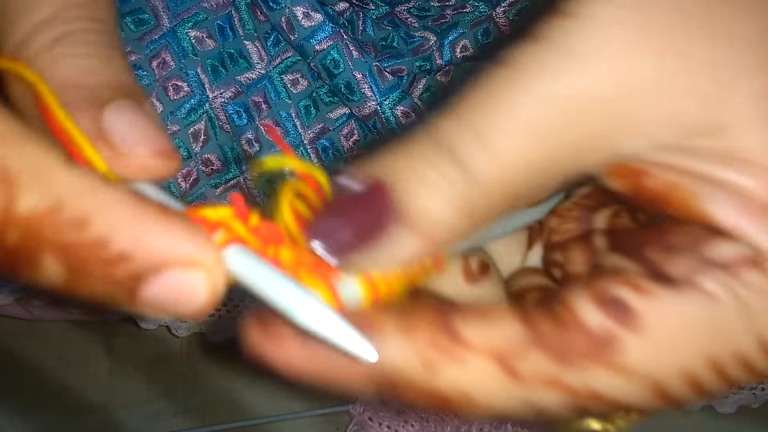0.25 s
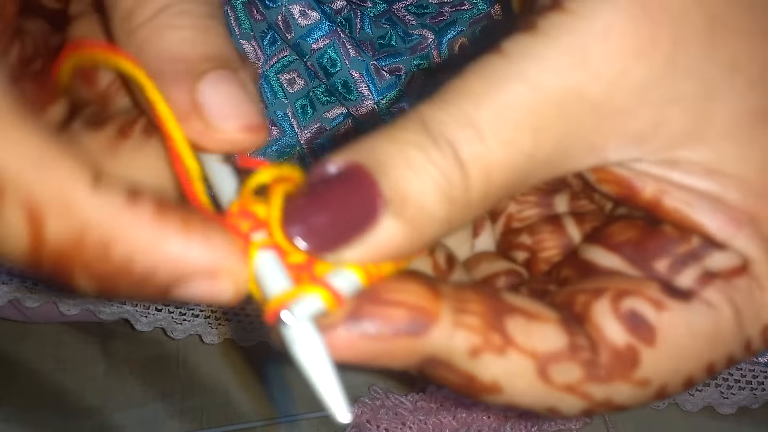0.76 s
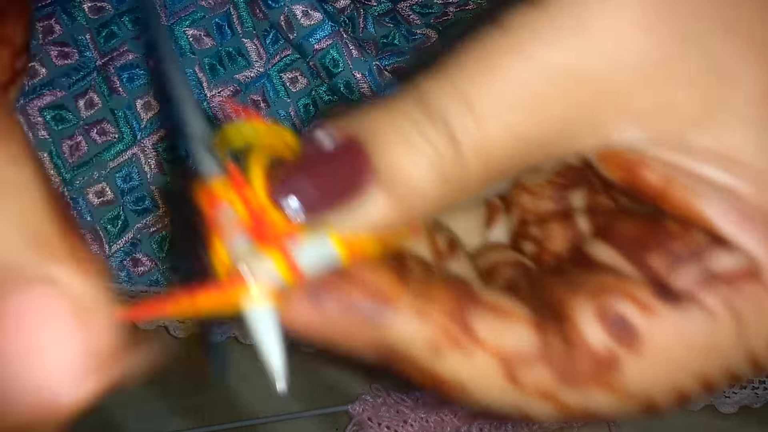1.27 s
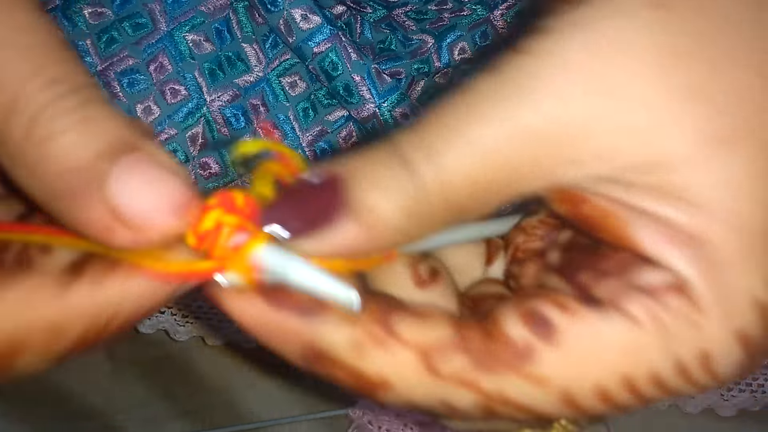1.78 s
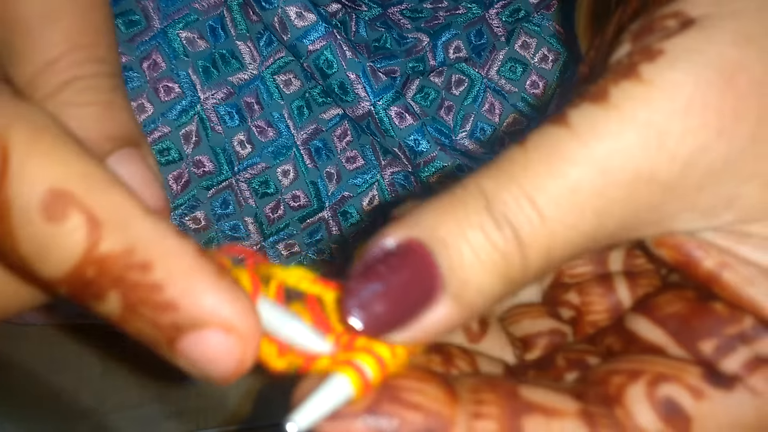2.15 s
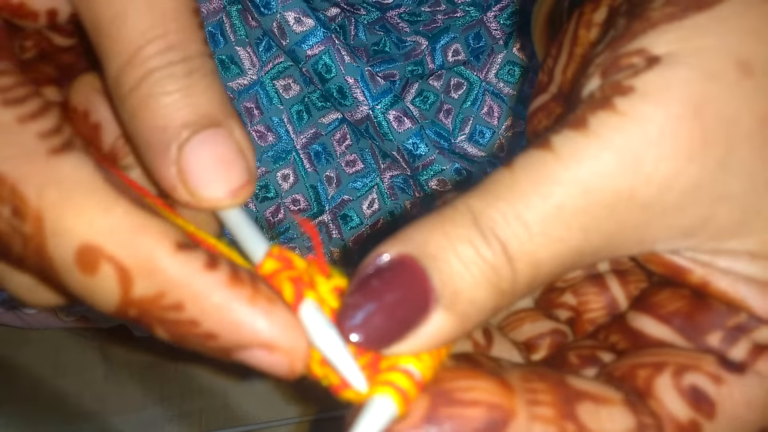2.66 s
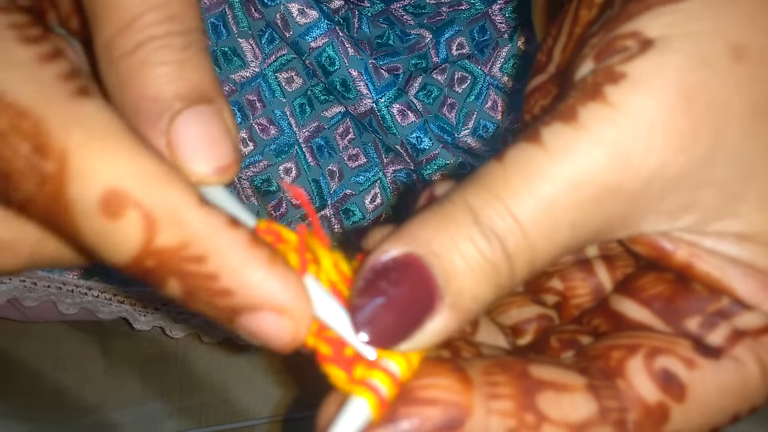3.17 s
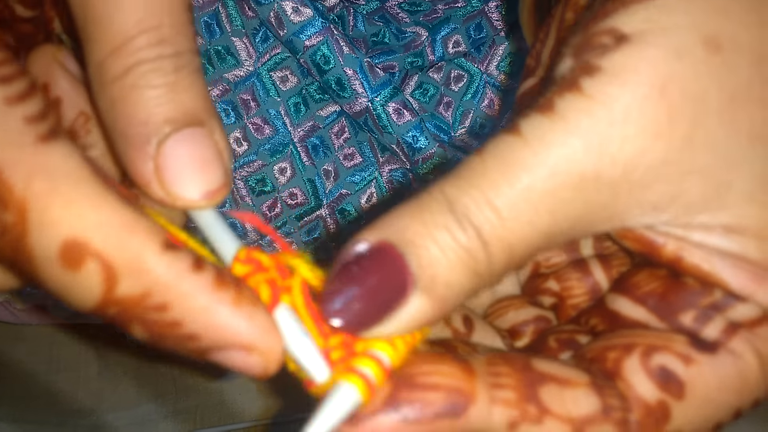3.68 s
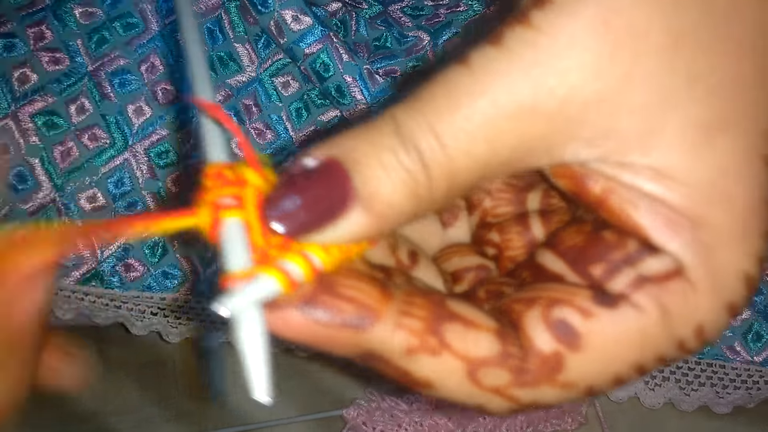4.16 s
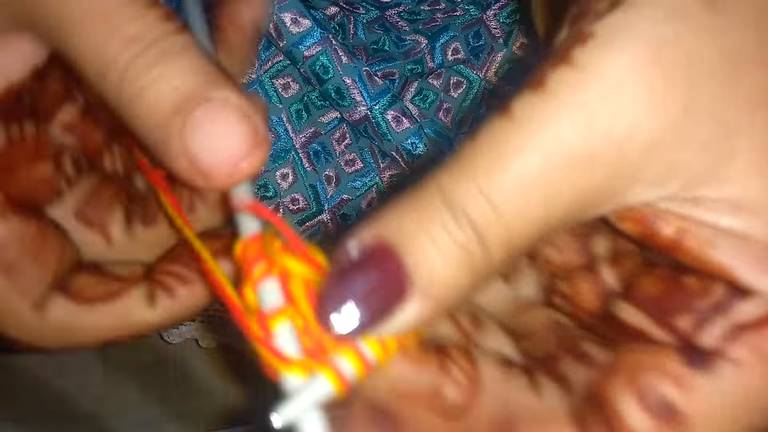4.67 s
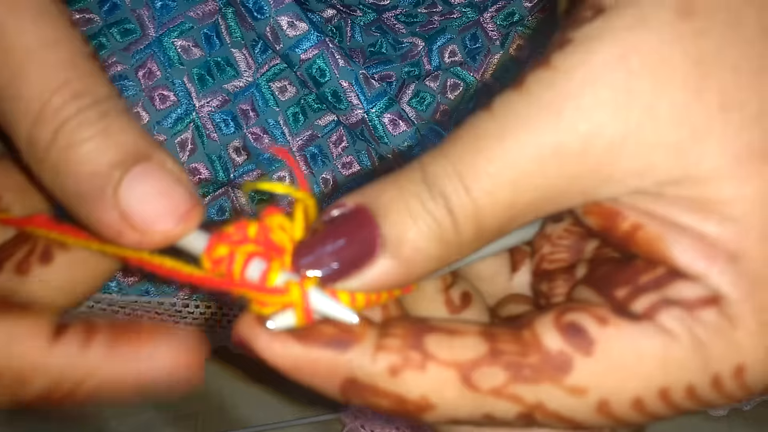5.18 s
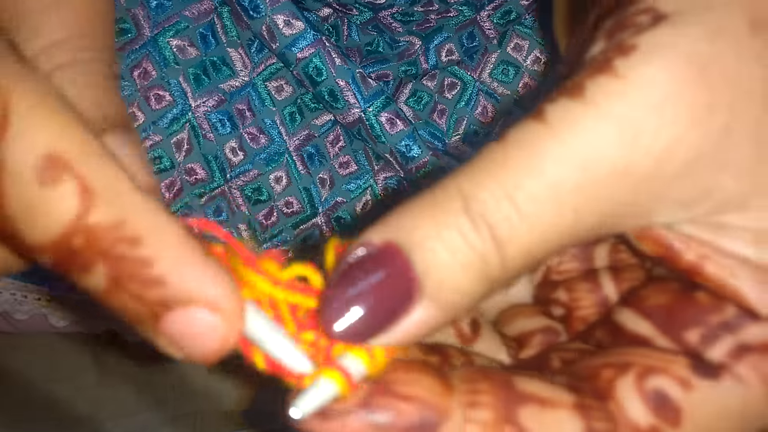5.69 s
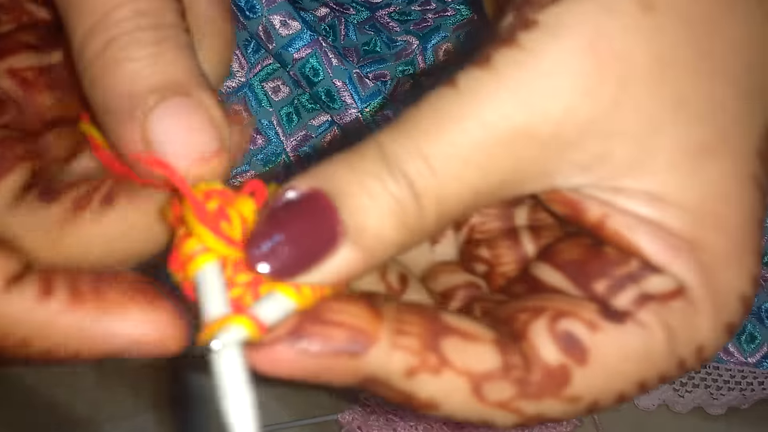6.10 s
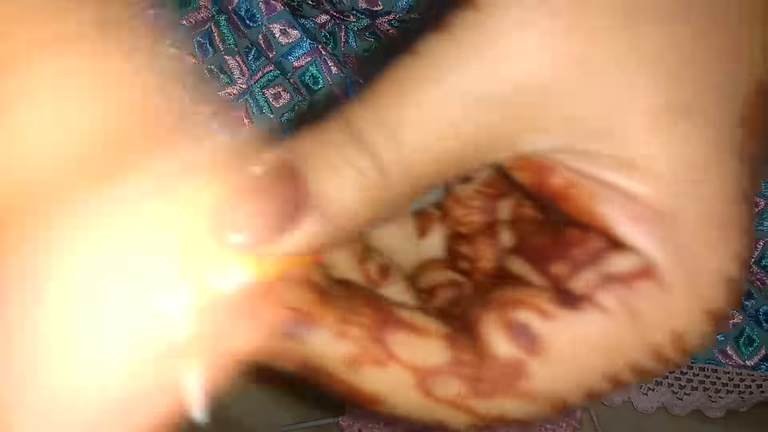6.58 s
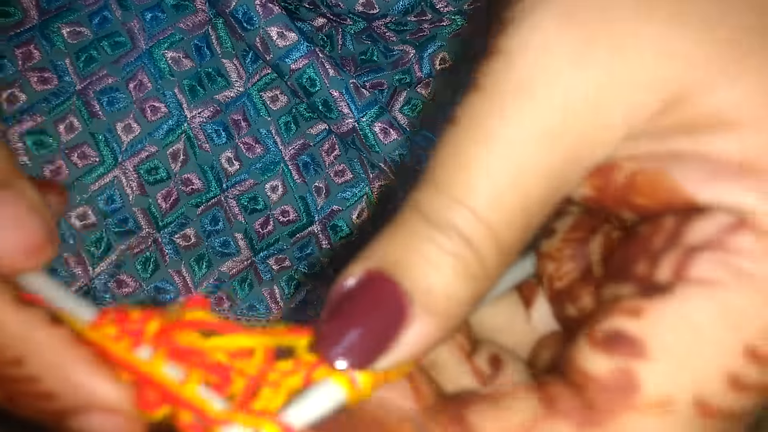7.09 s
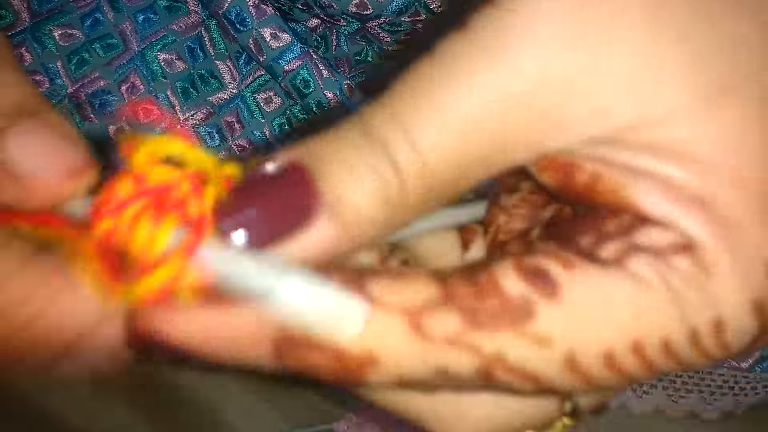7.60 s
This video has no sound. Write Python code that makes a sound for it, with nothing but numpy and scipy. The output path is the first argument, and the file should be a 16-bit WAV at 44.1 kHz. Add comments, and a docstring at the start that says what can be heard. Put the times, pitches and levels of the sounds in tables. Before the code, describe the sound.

Hand knitting, close up, in a small quiet room. Soft hiss, low motor-like hum and a gently swelling rush sit behind throughout. From 0.2 s two hollow metal needles tick together near the left microphone, bright, short and dry, a few with a faint high ring; wool rustles airily over the tips. Around 0.7 s dull knocks and a tiny scrape join. Taps crowd together from 0.9 to 1.5 s, with sharp clicks at 1.24 and 1.46 s; the background dips after each, deeply the second time, then climbs back. From 1.6 to 3.5 s only sparse faint ticks remain, with small knocks near 3.4 and 3.6 s. Taps thicken at 4.0 to 4.6 s, then thin out. Two quick scrapes come at 6.0 s, followed by busy clicking, a strong tap and dip near 6.5 s, another clear tap at 7.0 s, and scattered light ticks to the end.

```python
"""Close in, a pair of microphones: wool rustles over needle tips, the room hisses, hums and rushes softly behind.
From 0.2 s two hollow metal knitting needles tap by the left one: struck modes, some ringing on; faint tones swell.
Dull knocks and short scrapes join from 0.7 s; the background dips at 1.2 s, deeply at 1.45 s, and climbs back.
A sparser stretch follows; the taps thicken again at 4 s and from 6 s, with two more scrapes and a dip at 6.5 s.
Short echoes follow the needles; the recorder takes a delayed copy of each side from the other to widen the image."""
import sys
import numpy as np
from scipy import signal
from scipy.fft import rfft, irfft, next_fast_len
from scipy.io import wavfile

SR = 44100
rng = np.random.default_rng(int(sys.argv[2]) if len(sys.argv) > 2 else 0)


def persist_wave(psi):
    """Save psi, clipped to +-1, as 16-bit WAV."""
    counts = np.round(np.clip(psi, -1, 1) * 32767).astype(np.int16)
    wavfile.write(sys.argv[1], SR, np.atleast_2d(counts).T)


N = 346185

# Levels are those in front of the microphones, ahead of the recorder's widening and filters.

# Wool sliding over the tips. Each row: time in seconds, rms level in dB.
SLIDE = [(0, -62), (1.38, -60), (1.53, -70.5), (1.83, -74), (2.84, -74), (2.97, -67), (3.28, -75),
         (3.98, -61), (5.9, -65), (6.21, -62.5), (6.38, -59), (6.78, -69), (7.22, -60), (7.85, -68.5)]
# Broad resonances of the rustle. Each row: frequency in Hz, width in Hz, relative level in dB.
WOOL = [(3057, 167, -6.5), (5460, 1800, 1.5), (8200, 1070, 1.5), (12900, 5700, -5)]
SLIPS_PER_S, CLUMP_DB = 3000, 6   # median rate; spread of the rate as slips bunch together

# Spectrum of the room noise. Each row: frequency in Hz, relative density in dB per Hz.
ROOM_SPECTRUM = [(30, -7), (55, 10), (130, 7.5), (290, -1), (420, -8.5), (680, -10.5), (1000, -12),
                 (2000, -13), (4000, -17.5), (8000, -24), (12000, -41.5), (16000, -49.5)]
ROOM_DB = -49   # rms before the dips
# How alike the room is at both microphones. Each row: frequency in Hz, likeness from 0 to 1.
LIKENESS = [(60, 1), (200, 0.9), (350, 0.52), (700, 0.32), (1000, 0), (3000, 0.023), (8000, 0.04)]
# Lean of the room noise. Each row: frequency in Hz, left over right in dB.
LEAN = [(100, -1), (1000, -1.5), (5000, -0.5), (12000, -37.5)]
# Motor hum. Each row: frequency in Hz, width in Hz, rms level in dB before the dips.
HUM = [(130.3, 14, -62.7), (294, 7, -60.5), (590, 9, -71), (1178, 14, -75)]
# Soft rush that swells now and then. Each row: time in seconds, rms level in dB before the dips.
RUSH = [(0, -72), (1.09, -59.5), (1.46, -67), (1.6, -68.5), (2.67, -68.5), (3.78, -63), (4.6, -61),
        (5, -73), (5.5, -64.5), (6.2, -75), (6.4, -59), (6.7, -63), (7.28, -68), (7.85, -67.5)]
RUSH_HZ, RUSH_WIDTH_HZ = 655.5, 190

HISS_DB, HISS_LOW_HZ = -56.5, 7140   # the recorder's own hiss: level ahead of its low cut; the cut
# Dips of the background. Each row: start in seconds, depth in dB, hold in seconds from the start,
# recovery in dB per second.
DIPS = [(-.01, 2, .001, 2.5), (1.223, 7.5, 0.00086, 6), (1.448, 19, 0.46, 10.5), (4.054, 2.5, .1, 1.27),
        (6.458, 9, .001, 9)]
SINK_S = 0.025
ROOM_T60_S, WALL_CUT_HZ, WET_DB = 0.16, 7000, -11.5   # echoes: decay, treble cut, gain

# Needle taps. Each row: time in seconds, main body strength in dB (rms over 10 ms, before chance),
# low body over main in dB, high body over main in dB, chatter decay in seconds.
TAPS = [(0.1855, -39, -22, -3, 0.0012), (.193, -49, -10, -8, 0.0054), (0.2178, -41, -13, -0.5, 0.0023),
        (0.222, -44.5, -21, 5, 0.0024), (0.4004, -45.5, -5, -4, 0.0007), (0.57, -50, -1, -4, 0.00087),
        (0.574, -46, -1.5, -3, 0.0025), (.678, -59, 10, -2, 0.00094), (0.7026, -49.5, 3, -10, 0.002),
        (0.7583, -58, 14, -7, 0.0044), (0.8348, -47.5, -13, -1, .0008), (0.887, -39, -18, -8, 0.0031),
        (0.902, -39.5, -26, -9, 0.0037), (1.031, -56, 0, -6, 0.0023), (1.036, -45, -7, -5, 0.004),
        (1.0407, -48, -11, -6, 0.0029), (1.048, -44, -15, -6, 0.014), (1.0678, -40, -9, 1, 0.0034),
        (1.072, -46, -19, -3, 0.0028), (1.084, -49.5, -4, -6, 0.0024), (1.1565, -44.5, -25, -4, 0.00087),
        (1.1959, -48, -10, -3, 0.0046), (1.2367, -27, -44, -18, 0.00087), (1.25, -39.5, -20, -13, 0.0039),
        (1.292, -48.5, -13.5, 1, 0.0058), (1.318, -58.5, -15, 6, 0.0034), (1.3817, -54, 0, -9, 0.0022),
        (1.432, -46, -27, -4, 0.0049), (1.4572, -26, -10.5, 0.5, 0.00068), (1.465, -43.5, -3.5, 1, 0.016),
        (1.4985, -51, -2.5, 4, 0.029), (1.524, -59, -14, -1, 0.0042), (1.805, -68.5, -3, 4, 0.0023),
        (2.102, -55, -30, -6, 0.0055), (2.218, -56.5, -16.5, 2, 0.0048), (2.471, -62.5, -9, 2, 0.0032),
        (2.898, -59, -10, 8, 0.0036), (3.025, -59, -7, 8.5, 0.0037), (3.0782, -64, 2, 6, 0.0038),
        (3.5234, -59, -1, -4, 0.00098), (3.7503, -45.5, -10.5, 4, 0.001), (3.863, -57.5, 3, 7, 0.0043),
        (3.9983, -42.5, -22, -3, 0.00064), (4.0113, -36.5, -17.5, -4, 0.0027), (4.029, -50, -8, -8, 0.0027),
        (4.068, -36.5, -15, -4, 0.0016), (4.085, -51, -8, -2, .0015), (4.0898, -47, -10, -5, .0052),
        (4.134, -55, -6.5, 1, .011), (4.174, -54, -15, -9, 0.00089), (4.291, -52, -4, -3, 0.0017),
        (4.2948, -46.5, -17, -4, 0.00054), (4.307, -52, -3, 0, 0.0085), (4.459, -55, -10, -2, 0.0026),
        (4.463, -39.5, -27, 5, 0.003), (4.473, -50.5, -23, 10, .004), (4.492, -42, -17, -3, 0.002),
        (4.501, -40.5, -13.5, -3, 0.0047), (4.5663, -47, -6.5, -6, 0.0015), (4.578, -50, -8, -3, 0.0051),
        (4.766, -55, -1, 4.5, 0.15), (5.059, -51.5, -3.5, -5, 0.0043), (5.079, -48, -10, -1, .0018),
        (5.2047, -52.5, -15, -1, 0.0039), (5.357, -55.5, -6, 5.5, 0.0031), (5.606, -52, -7, -5, 0.0053),
        (6.0047, -51, 0, -3, 0.0012), (6.027, -53, 5, -4, 0.001), (6.0348, -51, 6, -6, 0.001),
        (6.0498, -41, -7, -6, 0.0015), (6.053, -53.5, 12, -1, 0.0019), (6.0566, -51, 20, -3, 0.0011),
        (6.063, -58, 6, -3, 0.0033), (6.0673, -56, -2, -3, 0.0011), (6.074, -59, 3, -3, 0.0018),
        (6.137, -53.5, -14, -4, .005), (6.1807, -45.5, -4.5, 0, 0.00086), (6.1838, -40.5, -27, -5, 0.0035),
        (6.2533, -40.5, -17, -7, 0.00083), (6.2863, -42.5, -22, -13, 0.0022), (6.345, -54, -13, -9, .002),
        (6.357, -45.5, -23, -7, 0.00085), (6.4114, -47.5, -2, -3, 0.004), (6.424, -40, -11, -7, 0.014),
        (6.4323, -39, -17, -2, 0.0018), (6.4355, -38, -20, -6, 0.002), (6.4395, -38.5, -18, -3, .003),
        (6.468, -31.5, -18, -6, 0.00082), (6.477, -49, -8, -6, .002), (6.5298, -49, -37, 1, 0.0033),
        (6.553, -56, -26, 9, .0015), (6.63, -53, -27, -21, 0.00071), (6.635, -51.5, -14, -5, 0.0031),
        (6.6773, -44, -22, -5, 0.006), (6.6836, -39, -15.5, -3, 0.0015), (6.708, -55, -3, -7, 0.0027),
        (6.8278, -55, -7, 2, 0.0046), (6.8528, -54, -10, -3, 0.003), (6.953, -50.5, -20, 6, 0.0026),
        (7.002, -33.5, -21, -12, 0.0045), (7.0233, -56, -25, -11, 0.015), (7.062, -49, -18, -8, 0.0092),
        (7.1475, -45, -6, 0, 0.0013), (7.343, -59.5, 4, -4, 0.011), (7.3667, -49.5, -3.5, 1, 0.001),
        (7.5955, -51.5, -3, 3.5, 0.0019), (7.612, -51, -9, 2, 0.018)]
# Needle modes. Each row: frequency in Hz, relative level in dB, t60 in seconds.
NEEDLE = [(2968, 0.5, 0.0045), (3340, -4.5, 0.003), (4280, 10, 0.033), (5010, 4.5, 0.0042),
          (6020, 7, 0.076), (6080, 11, 0.077), (6160, 3, 0.00064), (7230, 4, 0.0014), (8250, -5, 0.0037),
          (9187, 0.5, 0.015), (9370, 0, 0.0081), (9840, 1.5, 0.0054), (10840, -1, 0.0035),
          (11490, 10, 0.12), (11500, -4, 0.054), (12700, -2.5, 0.0016), (13130, 9, 0.068),
          (13500, -5, 0.0029), (15200, 0, 0.0035)]
# Borders between the low, middle, main and high body, in Hz.
BODY_BORDERS_HZ = [4700, 7800, 10400]
# Pitch shifts of the damped modes by the grip, as shares of their frequency.
GRIPS = [-.012, 0, .012]
# Taps on a tube the fingers leave free, so it rings on. Each row: time in seconds, level in dB,
# upper modes over lower in dB.
FREE_RINGS = [(0.2206, -57, 7), (1.433, -65, 13), (1.524, -70, 14), (2.218, -71.5, 6), (2.8987, -70, 2),
              (4.0108, -54, 0), (4.4618, -57.5, 3), (5.204, -64, -7), (6.052, -57.5, -3), (6.185, -62, 3),
              (6.432, -67, 13), (6.531, -67, -2), (6.951, -67, 18), (7.062, -70, -10)]
FREE_T60_S = .028   # modes slower than this sound only in the free rings
FIRST_BLOW, CHATTER_PER_S = 0.7, 5000   # size of the blow among rebounds up to 1; rebound rate
RISE_S, RISE_SHARE = .0007, .25   # grazing lead-up: base, plus this share of the chatter decay
SNAP_DB, SNAP_LOW_HZ, SNAP_HIGH_HZ = 17, 2800, 7500   # toneless snap: over the middle body; its band
FAR_SIDE_DB, FAR_LAG_S = -13, .00025   # a tap at the right microphone: over left; longest extra path
MIDDLE_DB, MIDDLE_FOLLOWS = 3, 0.74   # middle body over main; share of the low body's swing

# Faint far tones. Each row: start in seconds, end in seconds, frequency in Hz, width in Hz,
# level at full swell in dB.
FAR_TONES = [(3.38, 4.25, 250, 15, -61), (0.22, 0.53, 430, 6.1, -62.5), (3.7, 4.02, 1090, 61, -63.5),
             (0.77, 1.1, 718, 45, -62), (4.8, 5.1, 680, 18, -62.5), (5.15, 5.34, 660, 14, -65)]
# Dull knocks of hand or needle end. Each row: time in seconds, height in dB before panning,
# frequency in Hz, t60 in seconds.
KNOCKS = [(0.6935, -39, 1020, 0.0063), (0.725, -36, 2010, 0.011), (.861, -40, 1730, 0.016),
          (1.39, -37, 110, 0.11), (1.457, -27, 1000, 0.0025), (1.4574, -23.5, 1860, .004),
          (2.1, -41, 199, 0.01), (3.362, -38, 1530, 0.0079), (3.5773, -32, 1700, 0.0067),
          (6.973, -38.5, 120, 0.032)]
# One needle scraping along the other. Each row: start in seconds, end in seconds,
# starting level in dB ahead of the low cut.
SCRAPES = [(0.727, 0.78, -56.5), (6.003, 6.021, -51), (6.028, 6.046, -45)]
CATCHES_PER_S, SCRAPE_FADE_DB = 1000, 1.5   # catch rate; loss over a stroke
SCRAPE_HZ, SCRAPE_SLOPE_DB = 3200, 31   # the region it drives best; loss per octave away from it
SCRAPE_LOW_HZ = 2400   # low cut: a light touch drives little below this

# Gain of the copy subtracted from the other side. Each row: frequency in Hz, gain in dB.
CROSS_GAIN = [(500, -0.9), (2400, -1.04), (5000, -2.5), (7500, -5.2), (12000, -5.5)]
CROSS_LAG_S, CROSS_TURN, CROSS_CORNER_HZ = .00037, .95, 2500   # lag; extra phase turn (rad), its corner
# Balance of the recorder. Each row: frequency in Hz, left over right in dB.
BALANCE = [(500, -2), (3000, -1.15), (8500, -1), (11500, -6.5)]
MIC_TOP_HZ, CUTOFF_HZ = 14680, 17000   # treble fade; steep cut


def from_db(db):
    """Gain of a level in dB."""
    return 10 ** (np.asarray(db) / 20)


def rms_one(x):
    """Scaled to rms 1."""
    return x / np.sqrt(np.mean(x ** 2) + 1e-20)


def level_curve(rows):
    """Gain sample by sample from rows of time and dB."""
    s, db = np.transpose(rows)
    return from_db(np.interp(np.arange(N) / SR, s, db))


def at_hz(points, hz):
    """A spectrum read on a log-frequency axis."""
    point_hz, values = np.transpose(points)
    return np.interp(np.log(hz), np.log(point_hz), values)


def samples(s):
    """Seconds to the nearest sample."""
    return np.round(s * SR).astype(int)


def ring(clicks, hz, t60):
    """A two-pole mode: a unit click sets off a decaying sine of height 1."""
    r, w = from_db(-60 / (t60 * SR)), 2 * np.pi * hz / SR
    return signal.lfilter([0, np.sin(w)], [1, -2 * r * np.cos(w), r * r], clicks + 1e-18)


def resonant(x, hz, width_hz):
    """A resonance of the given width; rms 1."""
    return rms_one(ring(x, hz, np.log(1000) / (np.pi * width_hz)))


def placed(x, left_db):
    """Left over right in dB, keeping the mean power of the two microphones."""
    return x * from_db(np.outer([.5, -.5], left_db)) / np.sqrt(np.cosh(left_db * np.log(10) / 20))


def slide():
    """Wool over the tips: dense uneven slips of fibres sound through broad resonances."""
    sizes = from_db(3.8 * np.minimum(rng.exponential(1, N), 5)) * rng.choice([-1, 1], N)
    bunching = np.repeat(rng.standard_normal(N // 256 + 1), 256)[:N]   # a new rate every 6 ms
    rate = SLIPS_PER_S * from_db(CLUMP_DB * bunching)
    slips = sizes * (rng.random(N) < rate / SR)
    rustle = sum(from_db(db) * resonant(slips, hz, width) for hz, width, db in WOOL)
    return placed(level_curve(SLIDE) * rms_one(rustle), 13.4)


def room_noise():
    """Room hiss: noise shared by the microphones more in the bass than above; rms 1."""
    size = next_fast_len(N)
    hz = np.maximum(np.arange(size // 2 + 1) * SR / size, 1)
    mid, side = rfft(rng.standard_normal((2, size)))
    alike = np.clip(at_hz(LIKENESS, hz), -1, 1)
    pair = np.sqrt(1 + alike) * mid + np.sqrt(1 - alike) * side * [[1], [-1]]
    shaped = placed(pair, at_hz(LEAN, hz)) * from_db(at_hz(ROOM_SPECTRUM, hz))
    return rms_one(irfft(shaped, size)[:, :N])


def hum():
    """Wavering motor tones: noise in narrow resonances, separate at each microphone."""
    return sum(from_db(db) * resonant(rng.standard_normal((2, N)), hz, width) for hz, width, db in HUM)


def rush():
    """Soft rush: noise twice through one resonance, swelling and sinking."""
    once = resonant(rng.standard_normal(N), RUSH_HZ, RUSH_WIDTH_HZ)
    return placed(level_curve(RUSH) * resonant(once, RUSH_HZ, RUSH_WIDTH_HZ), 0.85)


def background_db():
    """Each dip falls quickly, holds and climbs back steadily; the deepest one rules."""
    t = np.arange(N) / SR
    depths = []
    for start, depth_db, hold, rate in DIPS:
        fall = np.clip((t - start) / SINK_S, 0, 1)
        recovered_db = rate * np.maximum(t - start - hold, 0)
        depths.append(fall * np.clip(depth_db - recovered_db, 0, None))
    return -np.max(depths, axis=0)


def recorder_hiss():
    """The recorder's own hiss: high-passed noise, dipping with the background."""
    hiss = signal.lfilter(*signal.butter(2, HISS_LOW_HZ, "high", fs=SR), rng.standard_normal((2, N)))
    return from_db(HISS_DB + background_db()) * hiss


def walls(x):
    """Reverberation: dying noise, one tail a side, treble dulled, unit energy."""
    t = np.arange(SR // 2) / SR
    tails = rng.standard_normal((2, len(t))) * from_db(-60 * t / ROOM_T60_S)
    tails *= np.minimum(t / 0.0018, 1)
    tails = signal.lfilter(*signal.butter(1, WALL_CUT_HZ, fs=SR), tails)
    tails /= np.sqrt(np.sum(tails ** 2, axis=1, keepdims=True))
    return signal.fftconvolve(x[None], tails, axes=1)[:, :N]


def tap_contacts(chatter_s):
    """Grazing touches, a blow and dying rebounds, of unit energy; also the samples ahead of the blow."""
    t = np.arange(SR // 24) / SR
    draws = rng.random((len(chatter_s), 2, len(t)))
    rebounds = (draws[:, 0] < CHATTER_PER_S / SR) * (2 * draws[:, 1] - 1)
    rise_s = np.clip(RISE_S + RISE_SHARE * chatter_s, 1e-4, .004)
    decay = np.exp(-t / np.maximum(chatter_s, 1e-4)[:, None])
    contact = rebounds * decay * np.minimum(t / rise_s[:, None], 1)
    lead = samples(rise_s)
    contact[np.arange(len(lead)), lead] = FIRST_BLOW
    return contact / np.sqrt(np.sum(contact ** 2, axis=1, keepdims=True)), lead


def taps():
    """Needle on needle: each contact snaps and drives the damped modes, detuned by the grip."""
    s, main_db, low_db, high_db, chatter_s = np.transpose(TAPS)
    middle_db = MIDDLE_DB + MIDDLE_FOLLOWS * np.minimum(low_db, 3)
    body_db = main_db + [low_db, middle_db, 0 * s, high_db]
    luck_db = rng.normal(0, 2, (len(s), len(NEEDLE)))
    contact, lead = tap_contacts(chatter_s)
    t = np.arange(contact.shape[1]) / SR
    at = samples(s)[:, None] + np.arange(len(t)) - lead[:, None]
    grip = rng.integers(len(GRIPS), size=len(s))
    far_at = at + samples(rng.random(len(s)) * FAR_LAG_S)[:, None]   # a new path for each tap

    def struck(strength):
        """The contacts as they reach the left and the right microphone."""
        force = (strength[:, None] * contact).ravel()
        left = np.bincount(at.ravel(), force, N)[:N]
        right = from_db(FAR_SIDE_DB) * np.bincount(far_at.ravel(), force, N)[:N]
        return np.sqrt(2) * np.array([left, right])

    snaps = struck(from_db(body_db[1] + SNAP_DB))
    out = signal.lfilter(*signal.butter(1, [SNAP_LOW_HZ, SNAP_HIGH_HZ], "band", fs=SR), snaps)
    for k, (hz, level_db, t60) in enumerate(NEEDLE):
        if t60 > FREE_T60_S:
            continue
        # start height for 10 ms of energy shared by three modes
        start_db = 10 * np.log10(.04 * np.log(1000) / t60 / 3)
        body = body_db[np.searchsorted(BODY_BORDERS_HZ, hz)]
        strength = from_db(body + start_db + level_db + luck_db[:, k])
        # level out the whole chatter as this mode feels it
        strength /= np.maximum(abs(contact @ np.exp(-2j * np.pi * hz * t)), .5)
        for g, shift in enumerate(GRIPS):
            out += (-1) ** k * ring(struck(strength * (grip == g)), hz * (1 + shift), t60)
    return out


def free_rings():
    """A tube the fingers leave free: single blows set its long-lived modes ringing."""
    s, db, upper_db = np.transpose(FREE_RINGS)
    out = np.zeros((2, N))
    for hz, level_db, t60 in NEEDLE:
        if t60 > FREE_T60_S:
            luck_db = rng.normal(0, 1.7, len(s))
            blow_db = db + upper_db * (hz > BODY_BORDERS_HZ[-1]) + level_db + luck_db
            out += placed(ring(np.bincount(samples(s), from_db(blow_db), N), hz, t60), 23.0)
    return out


def far_tones():
    """Faint far tones: narrow noise under a half-sine swell."""
    t = np.arange(N) / SR
    out = np.zeros(N)
    for start, end, hz, width, db in FAR_TONES:
        swell = np.sin(np.pi * np.clip((t - start) / (end - start), 0, 1))
        out += from_db(db) * swell * resonant(rng.standard_normal(N), hz, width)
    return placed(out, 1.0)


def knocks():
    """Soft contacts of hand or needle end: one damped mode each."""
    out = sum(from_db(db) * ring(np.arange(N) == round(s * SR), hz, t60) for s, db, hz, t60 in KNOCKS)
    return placed(out, 31.0)


def scrapes():
    """Uneven catches of the surfaces drive the needle's lower modes; each stroke starts at once and fades."""
    t = np.arange(N) / SR
    sizes = from_db(2.4 * np.minimum(rng.exponential(1, N), 4)) * rng.choice([-1, 1], N)
    catches = sizes * (rng.random(N) < CATCHES_PER_S / SR)
    strokes = np.zeros(N)
    for start, end, db in SCRAPES:
        fade_db = SCRAPE_FADE_DB * np.clip((t - start) / (end - start), 0, 1)
        strokes += from_db(db - fade_db) * (t > start) * (t < end)
    body = np.zeros(N)
    for hz, db, t60 in NEEDLE:
        if hz < BODY_BORDERS_HZ[1] and t60 < FREE_T60_S:
            drive_db = db - SCRAPE_SLOPE_DB * abs(np.log2(hz / SCRAPE_HZ))
            body += from_db(drive_db) * rms_one(ring(catches, hz, t60))
    low_cut = signal.butter(4, SCRAPE_LOW_HZ, "high", fs=SR, output="sos")
    return placed(signal.sosfilt(low_cut, strokes * rms_one(body)), 20.5)


def scene():
    """Needles near the left microphone, the room around; echoes sink and rise with the background."""
    near = slide() + taps() + free_rings() + knocks() + scrapes()
    level = from_db(background_db())
    # echoes start from the background level of 5 ms earlier
    lagging = np.concatenate([np.full(SR // 200, level[0]), level])[:N]
    echoes = from_db(WET_DB) * walls(near.sum(axis=0) / lagging)
    background = from_db(ROOM_DB) * room_noise() + hum() + rush() + echoes
    return near + level * background + far_tones()


def record(dry):
    """Each side loses a delayed copy of the other; own hiss joins, the top fades, then a steep cut."""
    size = next_fast_len(N + 100)
    hz = np.maximum(np.arange(size // 2 + 1) * SR / size, 1)
    turn = 2 * np.pi * hz * CROSS_LAG_S + CROSS_TURN * np.tanh(hz / CROSS_CORNER_HZ)
    sides = rfft(dry, size)
    sides = sides - sides[::-1] * from_db(at_hz(CROSS_GAIN, hz)) * np.exp(-1j * turn)
    sides += rfft(recorder_hiss(), size)
    wide = irfft(placed(sides, at_hz(BALANCE, hz)), size)[:, :N]
    wide = signal.sosfilt(signal.butter(10, MIC_TOP_HZ, fs=SR, output="sos"), wide)
    return signal.sosfilt(signal.cheby2(12, 70, CUTOFF_HZ, fs=SR, output="sos"), wide)


dry = scene()
out = record(dry)
persist_wave(out)
```